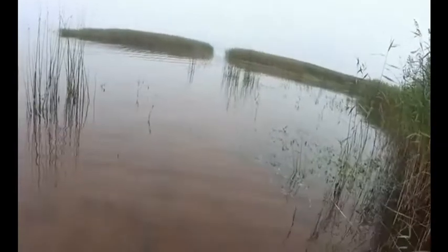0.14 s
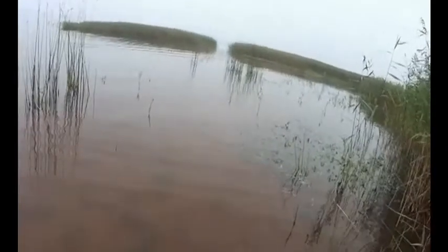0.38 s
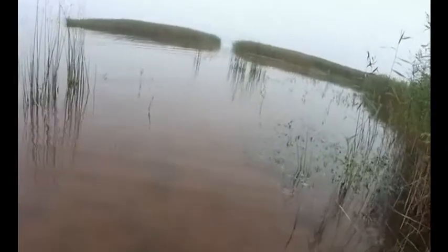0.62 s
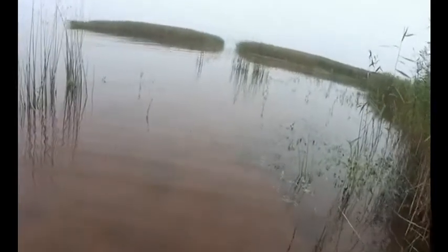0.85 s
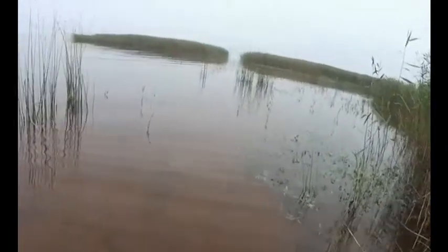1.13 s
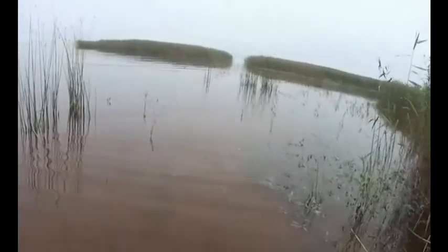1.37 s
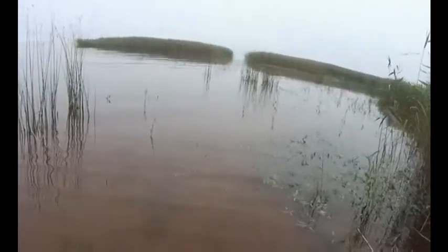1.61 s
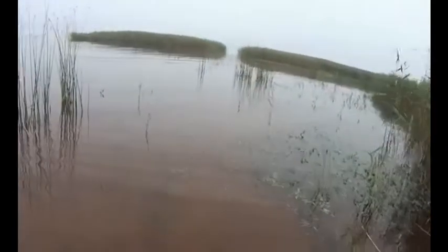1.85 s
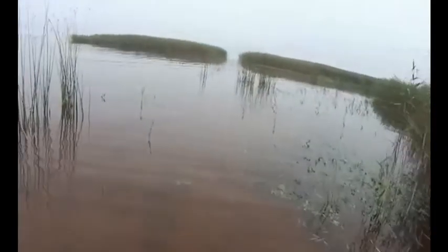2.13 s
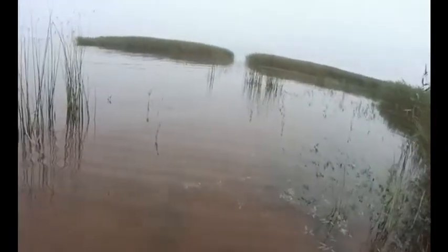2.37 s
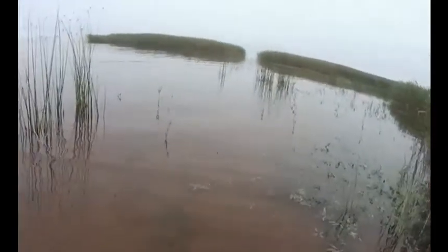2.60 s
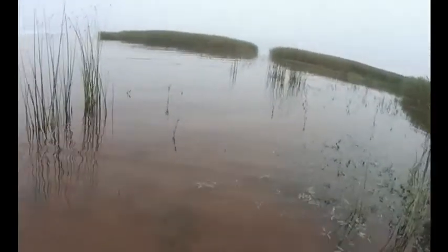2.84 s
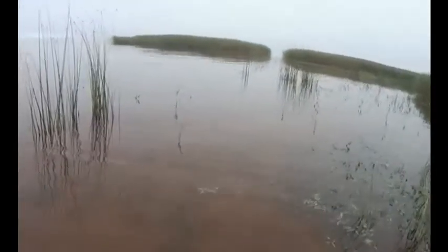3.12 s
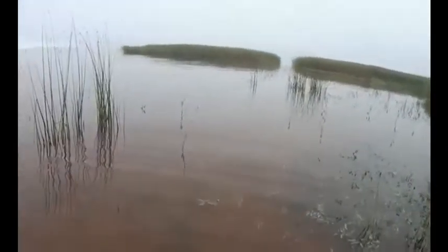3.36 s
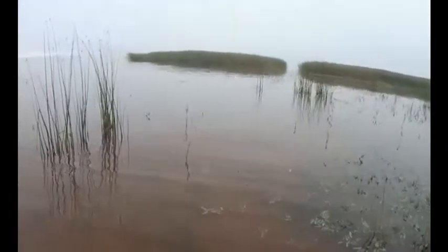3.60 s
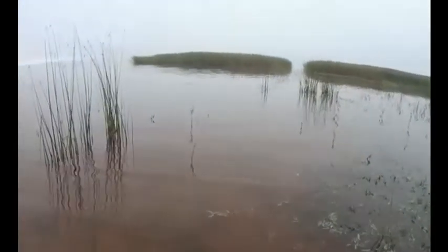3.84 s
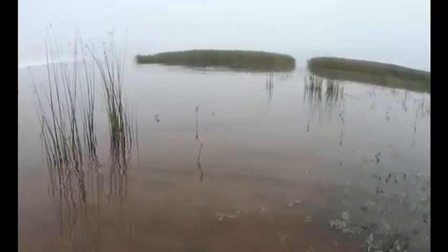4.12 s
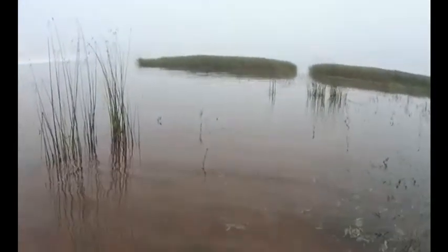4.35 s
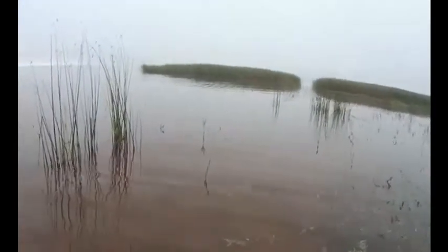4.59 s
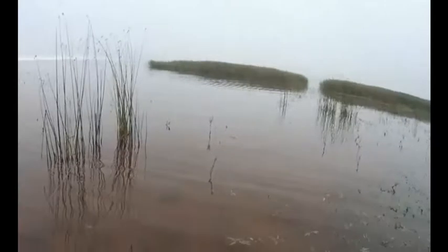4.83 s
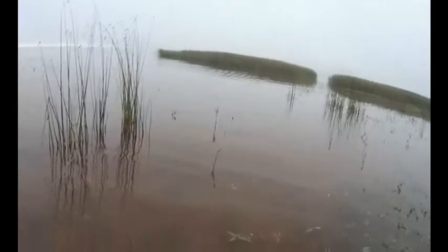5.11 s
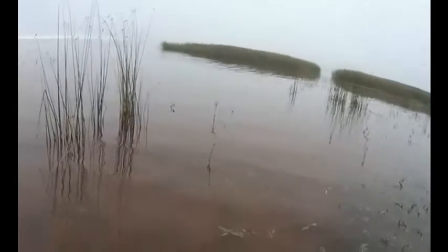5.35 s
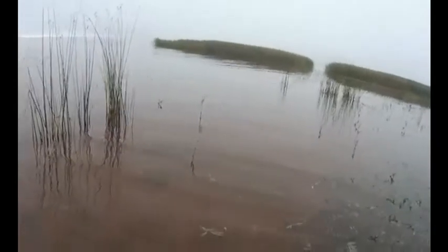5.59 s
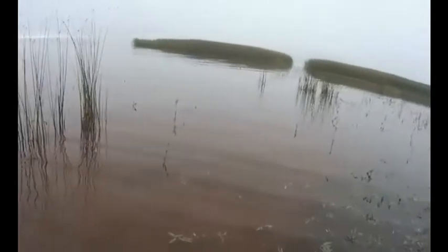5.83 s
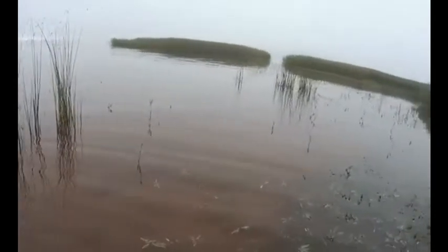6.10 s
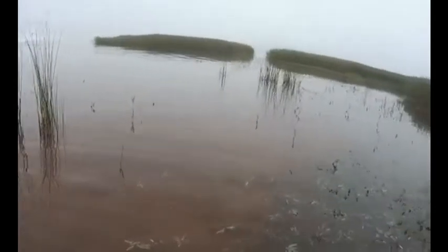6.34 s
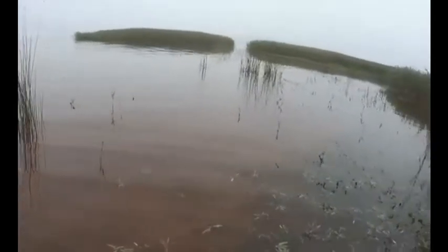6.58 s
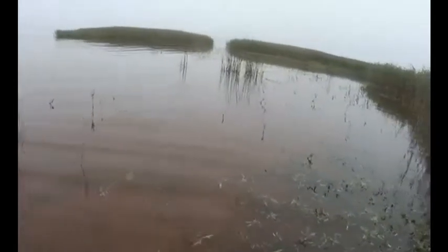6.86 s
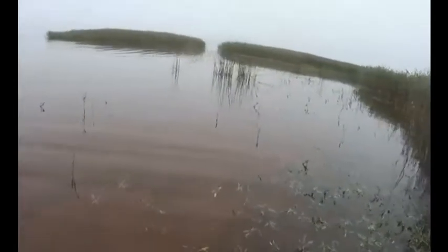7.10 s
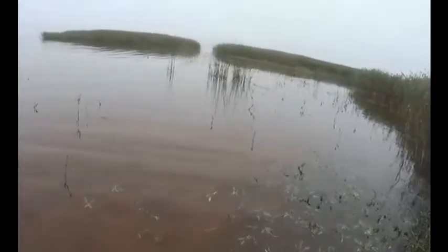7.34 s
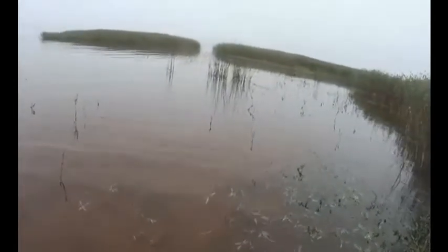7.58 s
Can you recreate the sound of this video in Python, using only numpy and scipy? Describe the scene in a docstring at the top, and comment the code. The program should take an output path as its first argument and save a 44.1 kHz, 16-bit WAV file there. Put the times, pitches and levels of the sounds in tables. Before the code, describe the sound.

Slow wading through shallow water, soft muffled swishes and small plops, low wind rumble on the microphone, and a few dull heavy thuds.

```python
"""Wading along a reedy shore

Someone wades slowly through shallow water, a small camera in a closed housing worn on the body.
Filtered noise makes the wind's rumble and rush, and clicks set off short swings for its buffeting.
Tiny ringing bubbles and noise make the swish, dulled by the housing's two resonances; larger bubbles plop.
Jolts and shoves thud as sagging swings with woody knocks, and dry ticks ring the shell.
Under it all lie the hiss and faint whine of the electronics."""
import sys
import numpy as np
from scipy import signal
from scipy.fft import rfft, irfft
from scipy.io import wavfile

SR = 44100
rng = np.random.default_rng(int(sys.argv[2]) if len(sys.argv) > 2 else 0)


def unload_wav(signal):
    """Save mono or channel-first audio to the path in sys.argv[1] as 16-bit WAV at rate SR, clipped to [-1, 1]."""
    wavfile.write(
        sys.argv[1],
        SR,
        np.round(np.clip(np.atleast_2d(signal).T, -1, 1) * 32767).astype(np.int16),
    )


def voltage_ratio(level):
    """Linear amplitude factor for a level in decibels (scalar or array-like)."""
    return 10 ** (np.asarray(level, float) / 20)


N = 340067  # samples, about 7.7 s


def evened(x):
    """Scales to rms 1."""
    return x / np.sqrt(np.mean(x ** 2) + 1e-20)


def coloured(x, points):
    """Filters x by a spectrum of (Hz, dB) points and evens it."""
    f, db = np.transpose(points)
    hz = np.fft.rfftfreq(len(x), 1 / SR)
    gain = voltage_ratio(np.interp(np.log(hz + 1), np.log(f + 1), db))
    return evened(irfft(rfft(x) * gain, len(x)))


def lumps(rate_hz, depth_db):
    """Slow random wavering of the gain, depth in dB rms."""
    steps = rng.standard_normal(N)
    return voltage_ratio(depth_db * coloured(steps, [(rate_hz, 0), (2 * rate_hz, -40)]))


def sparse(per_s, spread_db):
    """Clicks at random moments, a few of them large."""
    sizes = voltage_ratio(spread_db * np.minimum(rng.exponential(1, N), 4))
    return sizes * (rng.random(N) < per_s / SR)


def add(mix, s, sound):
    """Mixes a sound in at time s."""
    part = mix[max(round(s * SR), 0):][:len(sound)]
    part += sound[:len(part)]


def surges(rows, calm_db, column):
    """A calm level with a rounded swell and an almost equally long taper at each row, as a gain per sample."""
    t = np.arange(0, N / SR + .01, .005)
    power = voltage_ratio(2 * calm_db)
    for row in rows:
        u = abs(t - row[0]) / row[1]
        # swell and taper are shares of the surge's length
        shape = np.where(t < row[0], (u / 0.34) ** 2, (u / 0.38) ** 2.04)
        power = power + voltage_ratio(2 * row[column]) * np.exp(-shape)
    return np.interp(np.arange(N) / SR, t, np.sqrt(power))


def struck(modes, rise_s):
    """Dying sines of one struck object; a softer blow takes longer to rise."""
    t = np.arange(2000) / SR
    tones = sum(voltage_ratio(db - 60 * t / t60) * np.sin(2 * np.pi * hz * t) for hz, db, t60 in modes)
    return (1 - np.exp(-t / rise_s)) * tones


def ring(hz, fade_ms):
    """The housing on its mount swings once or twice, its pitch sagging from 1.61 toward 0.39 of hz."""
    u = np.arange(round(3 * fade_ms * SR / 1000)) / (fade_ms * SR / 1000)
    sag = 0.61
    turns = np.cumsum(hz * (1 - sag + 2 * sag * np.exp(-u))) / SR
    swell = (1 - np.exp(-u / 0.073)) * (u + 0.3)
    return swell * np.exp(.6 - 0.95 * u ** 2) * np.sin(2 * np.pi * turns)


def bubble(hz, length_ms, rise):
    """A pocket of air is pinched off, rings with a faint tail, and rises in pitch near the surface."""
    u = np.arange(round(7 * length_ms * SR / 1000)) / (length_ms * SR / 1000)
    turns = np.cumsum(hz * (1 + rise * (np.minimum(u, 1.8) - .4))) / SR
    fade = 1.15 * np.exp(-u / 0.58) + 0.17 * np.exp(-u / 3.0)
    return (1 - np.exp(-u / 0.044)) * fade * np.sin(2 * np.pi * turns)


# Slowly rising and falling wind rumble on the housing. Each row: time in seconds, rumble level in dB rms.
BREEZE = [(0.0, -33), (0.34, -41), (0.79, -31), (1.67, -39), (1.87, -30), (2.25, -37), (3.35, -34.5),
          (4.06, -38), (4.29, -35), (4.51, -29), (4.81, -37), (5.28, -40.5), (5.6, -32.5), (6.03, -38.5),
          (6.59, -38.5), (6.85, -45), (7.13, -38), (7.71, -31)]
# Puffs of air at the port. Each row: loudest moment in seconds, length in seconds,
# buffeting level in dB rms, level of the air's rush in dB rms.
GUSTS = [(.07, 0.084, -50, -63), (.3, 0.27, -52.5, -65), (.6, 0.2, -49.5, -60), (.75, 0.23, -47, -65),
         (1.0, 0.12, -42, -72), (1.39, 0.27, -45, -78), (1.63, 0.18, -68, -63.5), (1.95, 0.43, -45, -58.5),
         (2.22, 0.31, -43, -58), (2.74, 0.16, -47.5, -56), (2.86, 0.11, -45, -58), (2.96, 0.073, -48, -53),
         (3.05, 0.38, -46.5, -70), (3.25, .2, -50, -63), (3.45, 0.14, -65, -62), (4.29, 0.26, -42, -54.5),
         (4.42, 0.21, -41, -51), (4.58, 0.18, -49, -64), (4.74, 0.2, -46.5, -60), (5.2, 0.23, -47.5, -74),
         (5.47, 0.2, -45.5, -54.5), (5.8, 0.5, -43, -71), (6.18, 0.13, -45.5, -63), (6.7, 0.13, -29, -55),
         (6.9, 0.45, -50, -58.5), (7.35, 0.23, -42, -70), (7.52, 0.18, -64, -62.5), (7.66, 0.23, -48, -65)]
# Spectrum of the pressure rumble. Each row: frequency in Hz, relative level in dB per Hz.
RUMBLE = [(2, -14), (6, -1), (14, 0), (24, -7), (45, -8), (62, -18), (100, -45), (300, -110)]
# Spectrum of the rush of air. Each row: frequency in Hz, relative level in dB per Hz.
RUSH = [(60, -35), (120, -10.5), (200, -8), (300, -12), (480, -17.5), (800, -26.5), (1500, -56),
        (4000, -86)]


def wind():
    """Slow pressure rumble, eddies that shake the housing, and a lumpy rush past the port."""
    rumble = coloured(rng.standard_normal(N) * lumps(6, 2.2), RUMBLE)
    eddies = np.zeros(N)
    for hz in (48, 65, 92):
        kicks = sparse(40, 3.8) * rng.choice([-1, 1], N)
        eddies += signal.oaconvolve(kicks, ring(hz, 13.0))[:N]
    rush = coloured(rng.standard_normal(N), RUSH) * lumps(12.8, 1.73)
    breeze = voltage_ratio(np.interp(np.arange(N) / SR, *np.transpose(BREEZE)))
    buffeting = surges(GUSTS, calm_db=-54, column=2) * evened(eddies)
    return breeze * rumble + buffeting + surges(GUSTS, calm_db=-64.5, column=3) * evened(rush)


# A leg pushes through the water. Each row: loudest moment in seconds, length in seconds, level in dB rms.
STRIDES = [(.12, 0.62, -65), (.6, 0.5, -64.5), (1.39, 0.91, -64.5), (2.0, 0.57, -62.5), (2.25, 0.13, -67),
           (2.9, 0.54, -71.5), (3.9, 0.23, -65.5), (4.27, 0.17, -53.5), (4.39, 0.1, -50),
           (4.465, 0.073, -55.5), (4.74, 0.087, -65), (5.46, 0.16, -63), (6.31, .15, -61.5),
           (6.5, .2, -64.5), (6.7, 0.15, -52), (6.8, .08, -71), (6.89, 0.068, -56), (7.52, 0.35, -65)]
# Water as heard inside the closed housing. Each row: frequency in Hz, relative level in dB per Hz.
HOUSING = [(250, -8.5), (450, -6.5), (670, -6), (1040, -2.5), (1300, -10.5), (1650, -11), (2000, -7),
           (2350, -17), (2800, -16.5), (4100, -30.5), (7000, -74)]


def swish():
    """Many tiny bubbles of all sizes blur with the wash of pushed water, dulled by the housing."""
    stir = surges(STRIDES, calm_db=-68, column=2)  # the calm is water lapping between strides
    fizz = np.zeros(N)
    for hz in np.geomspace(400, 4000, 24):
        one_size = bubble(hz, 7000 / hz, 0.105) * hz
        fizz += signal.oaconvolve(sparse(45, 2.5), one_size)[:N]
    wash = evened(rng.standard_normal(N) * lumps(16.4, 2.3))
    # hard stirring drowns the single bubbles in the smooth wash
    standing_out = voltage_ratio(-6) * (stir / np.median(stir)) ** -.35
    return stir * coloured(standing_out * evened(fizz) + wash, HOUSING)


# Spectrum of the electronics' hiss. Each row: frequency in Hz, relative level in dB per Hz.
HISS = [(100, -10.5), (600, 11.5), (1000, -1.5), (1350, 3.5), (1950, 8), (2400, 3), (4000, 2), (5500, -0.5),
        (8000, -2), (11000, -3), (14000, -2), (15400, -6)]
# Thin whining lines. Each row: frequency in Hz, level in dB rms.
WHINE = [(6051, -86), (10072, -97), (12102, -106)]


def electronics():
    """Steady filtered noise for the hiss, with three thin whining sines."""
    t = np.arange(N) / SR
    whine = sum(np.sqrt(2) * voltage_ratio(db) * np.sin(2 * np.pi * hz * t) for hz, db in WHINE)
    hiss_db = -66.5  # rms
    return voltage_ratio(hiss_db) * coloured(rng.standard_normal(N), HISS) + whine


# Single bubbles close by. Each row: loudest moment in seconds, level in dB, pitch in Hz,
# rise of pitch as a share per bubble length.
BUBBLES = [(.02, -56, 1940, 0.019), (.147, -55, 934, 0.23), (.223, -56, 1860, 0), (.247, -52, 890, 0),
           (.246, -52, 1140, 0.022), (.31, -57, 1055, 0.026), (.418, -53, 1050, 0.02),
           (.463, -52, 707, 0.15), (.61, -54.5, 760, 0.1), (.79, -57, 1880, 0.046), (1.205, -50, 383, .05),
           (1.229, -49.5, 2050, 0.14), (1.27, -49, 1880, .06), (1.302, -49, 1220, 0.077),
           (1.43, -63, 707, 0.51), (1.486, -57, 1840, 0.022), (1.678, -56, 765, 0), (1.56, -58, 990, 0),
           (1.767, -55.5, 1020, 0.2), (1.905, -54, 1660, 0.3), (2.084, -56, 1030, 0), (2.438, -56, 1810, 0),
           (2.441, -55, 674, 0.069), (2.471, -52.5, 883, 0.28), (2.654, -54, 1030, .16),
           (2.733, -47.5, 994, 0.063), (2.814, -52.5, 1020, 0.052), (2.902, -55, 980, .2),
           (2.994, -58, 1920, 0), (3.003, -58, 815, .03), (3.632, -54.5, 1620, 0.16),
           (3.908, -47, 850, 0.35), (4.003, -54, 1074, .06), (4.044, -57, 1050, .2),
           (4.096, -50.5, 933, 0.047), (4.418, -49.5, 1470, .07), (4.754, -57, 570, 0),
           (5.132, -53.5, 1050, .1), (5.316, -54, 963, 0.12), (5.478, -56, 1680, .07),
           (6.178, -56.5, 1060, 0), (6.313, -57, 1070, 0.086), (6.375, -52.5, 1860, .11),
           (6.441, -53, 710, 0.019), (6.515, -54, 734, 0.011), (6.532, -54, 566, 0.082),
           (6.629, -42, 885, 0), (6.664, -50, 534, 0.21), (6.838, -54.5, 1920, 0.1), (6.867, -54, 1050, 0),
           (7.359, -53, 1750, .01), (7.39, -54.5, 2100, 0.078), (7.394, -41, 632, 0)]


def bubbles():
    """The separate plops and drips around the boots; big bubbles and rising ones ring longer."""
    mix = np.zeros(N)
    for s, db, hz, rise in BUBBLES:
        length_ms = 9.22 * (1000 / hz) ** 0.51 * (1 + 1.2 * rise)
        onset = s - 0.252 * length_ms / 1000
        add(mix, onset, voltage_ratio(db) * bubble(hz, length_ms, rise))
    return mix


# Dry ticks on the shell, perhaps from a strap or a splashed drop. Each row: start in seconds, level in dB.
TICKS = [(0.129, -46), (.331, -54), (1.302, -54), (2.426, -51.5), (3.857, -57), (3.917, -53),
         (4.357, -33.5), (4.377, -48), (6.627, -54), (6.661, -52), (7.389, -65)]
# Ringing modes of the shell. Each row: frequency in Hz, relative level in dB, t60 in seconds.
SHELL = [(800, -2, .015), (1300, 0.5, 0.01), (1796, 5.5, 0.012), (2210, -2, 0.011), (2770, -12, 0.015),
         (3940, -11, .01), (4750, -16, 0.0075)]


def ticks():
    """A light, quick blow rings only the shell."""
    mix, tick = np.zeros(N), struck(SHELL, 0.00074)
    for s, db in TICKS:
        add(mix, s, voltage_ratio(db) * tick)
    return mix


# Woody modes of the knocked housing. Each row: frequency in Hz, relative level in dB, t60 in seconds.
KNOCK = [(157, 6.5, 0.028), (242, 1, 0.029), (345, -1.5, 0.023), (510, 4, 0.0088), (760, -14.5, 0.016)]


def blow(mix, s, db, swing, sign, knock_db):
    """Moves the housing and adds a woody knock, the louder the sharper the blow."""
    level = np.sign(sign) * voltage_ratio(db)
    add(mix, s, level * swing)
    add(mix, s, level * voltage_ratio(knock_db) * struck(KNOCK, 0.0019))


# Jolts to the housing. Each row: start in seconds, level in dB, nominal swing in Hz,
# first swing as +1 or -1, sharpness as the knock's level in dB relative to the jolt.
THUDS = [(1.833, -28, 74, 1, -29), (1.933, -22, 54.5, 1, -37), (2.076, -32.5, 68.6, -1, -34),
         (2.263, -25, 43.7, 1, -40), (3.46, -35, 91.5, 1, -22), (4.285, -26, 55, 1, -32),
         (4.356, -9.5, 52.2, 1, -32), (4.373, -11, 73, 1, -36), (4.385, -12.5, 60, 1, -43),
         (4.722, -16.5, 59.5, 1, -37), (5.573, -30.5, 52, 1, -42), (5.699, -19, 55.6, 1, -38),
         (5.92, -21, 56.3, 1, -27), (6.404, -24.5, 59, 1, -16.5), (6.663, -34, 70, -1, -9)]


def jolts():
    """Each jolt sets the housing swinging; the fade time is 0.78 of a nominal swing."""
    mix = np.zeros(N)
    for s, db, hz, sign, knock_db in THUDS:
        blow(mix, s, db, ring(hz, 1000 * 0.78 / hz), sign, knock_db)
    return mix


# Damped shoves that push the pressure mostly one way. Each row: start in seconds, level in dB,
# fade in ms, direction as +1 or -1, sharpness as the knock's level in dB relative to the shove.
HEAVES = [(3.954, -40.5, 2.5, 1, 0), (4.313, -20, 14, -1, -40), (4.366, -9, 8.1, -1, -38),
          (4.41, -11, 33, 1, -61), (4.472, -18.5, 75, -1, -60), (4.569, -22, 52, 1, -63),
          (6.694, -23, 31, -1, -54), (6.746, -25.5, 3.5, -1, 1.5), (6.751, -12, 7.5, 1, -25),
          (6.807, -21.5, 34, -1, -60), (6.929, -28, 29, -1, -60), (6.996, -39, 5.3, -1, -20),
          (7.001, -21, 9.7, 1, -42)]


def shoves():
    """A heavily damped swing: the fade time is only 0.386 of a nominal swing."""
    mix = np.zeros(N)
    for s, db, fade_ms, sign, knock_db in HEAVES:
        blow(mix, s, db, ring(1000 * 0.386 / fade_ms, fade_ms), sign, knock_db)
    return mix


def scene():
    """All sources at one microphone."""
    mix = wind() + swish() + electronics() + bubbles() + ticks() + jolts() + shoves()
    return mix[None]


def band_limit(x):
    """A steep low-pass at the top of the band."""
    return signal.sosfilt(signal.butter(12, 15560, fs=SR, output="sos"), x)


def record(dry):
    """Limits the band at the top with a steep low-pass."""
    edge = signal.firwin(511, 15520, window=("kaiser", 9), fs=SR)  # edge in Hz
    mix = signal.oaconvolve(dry, edge[None], "same")
    return band_limit(mix)


dry = scene()
out = record(dry)
unload_wav(out)
```